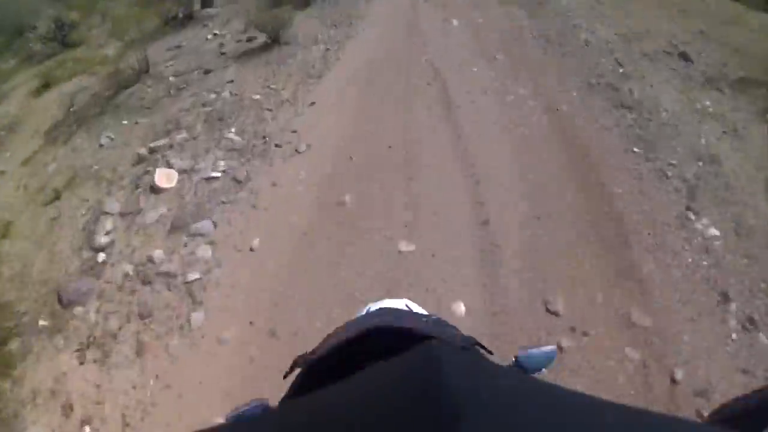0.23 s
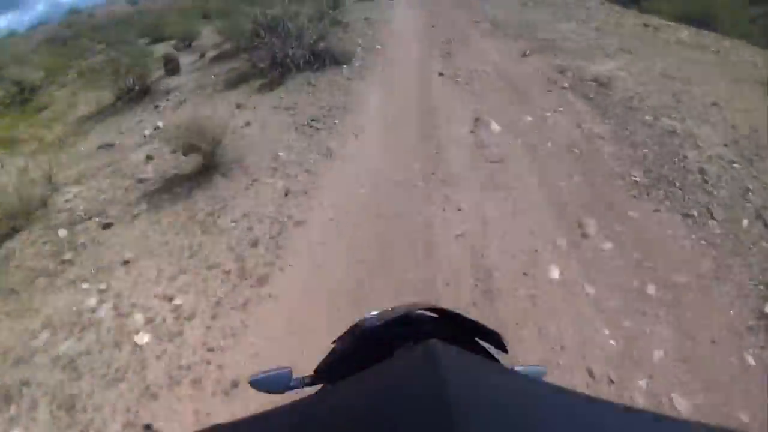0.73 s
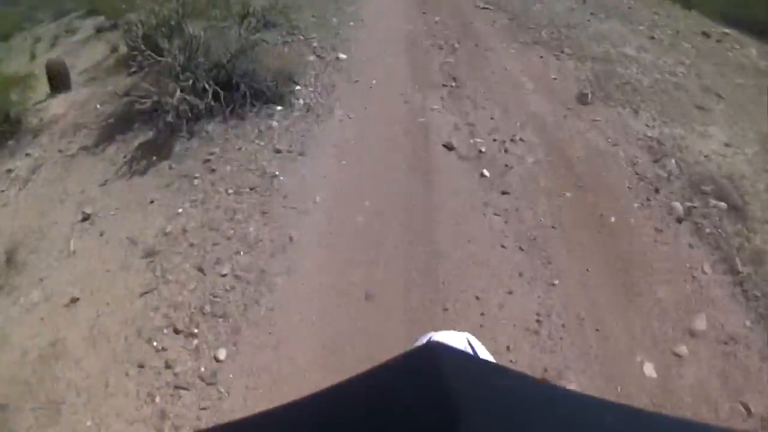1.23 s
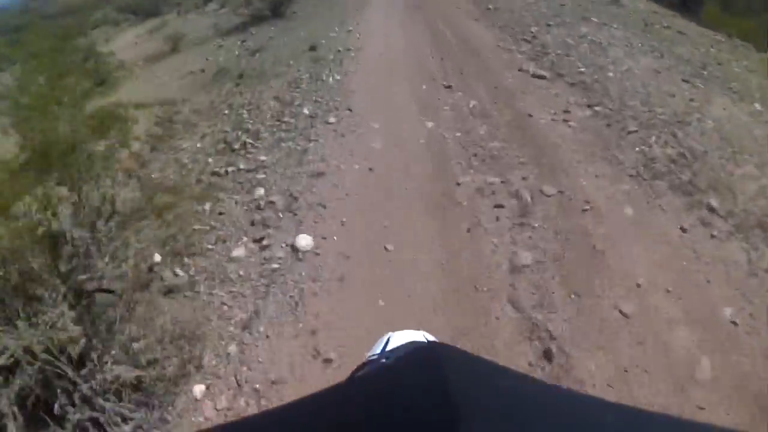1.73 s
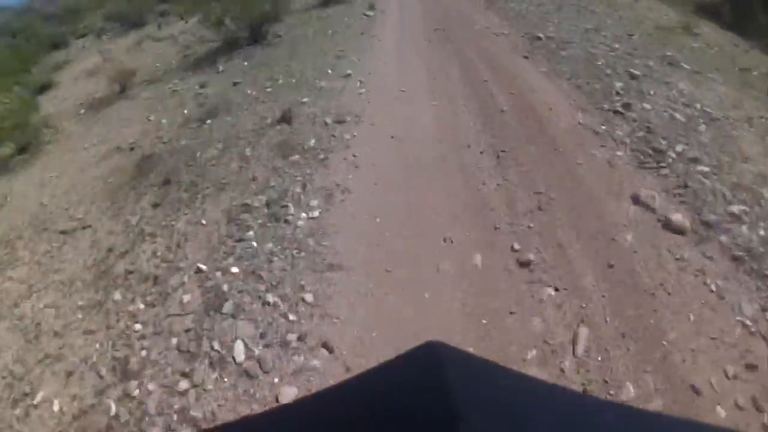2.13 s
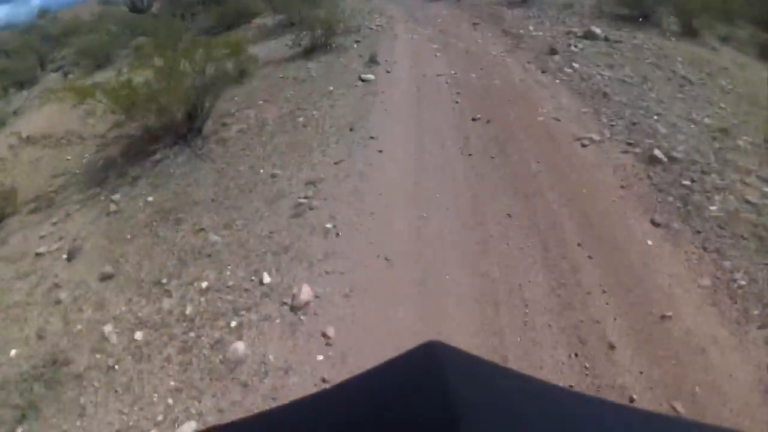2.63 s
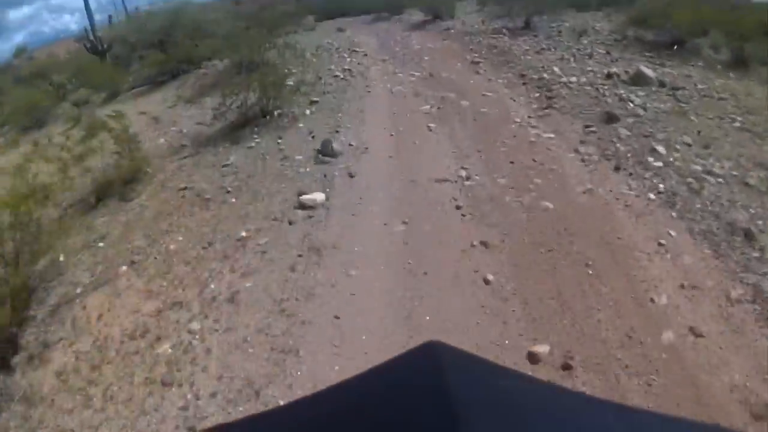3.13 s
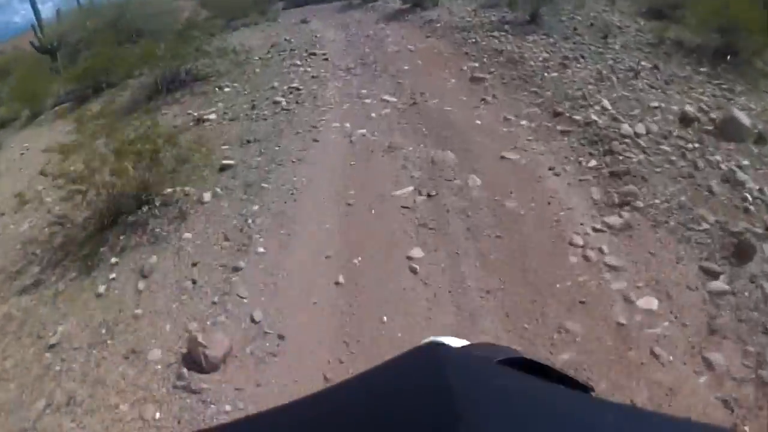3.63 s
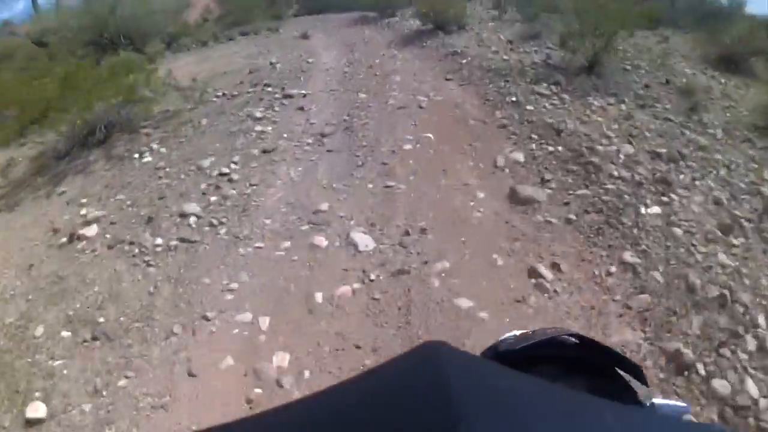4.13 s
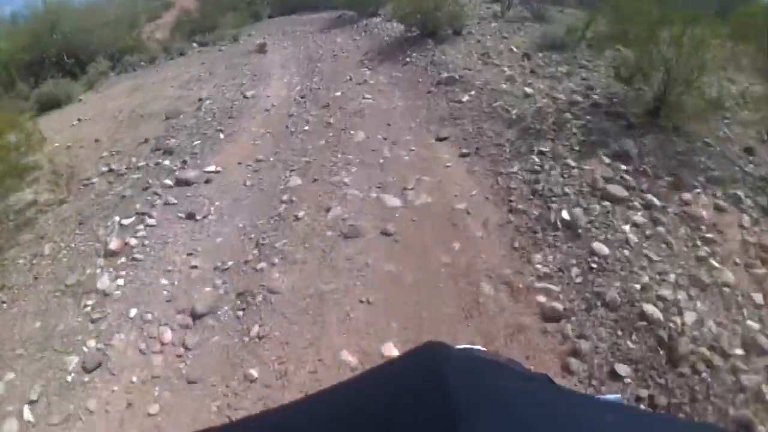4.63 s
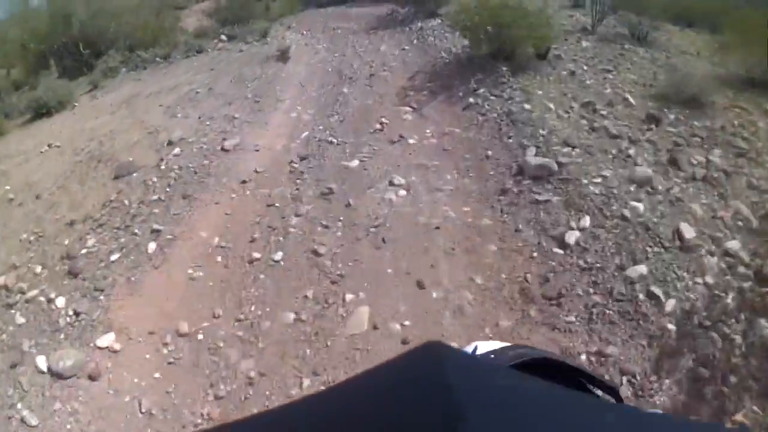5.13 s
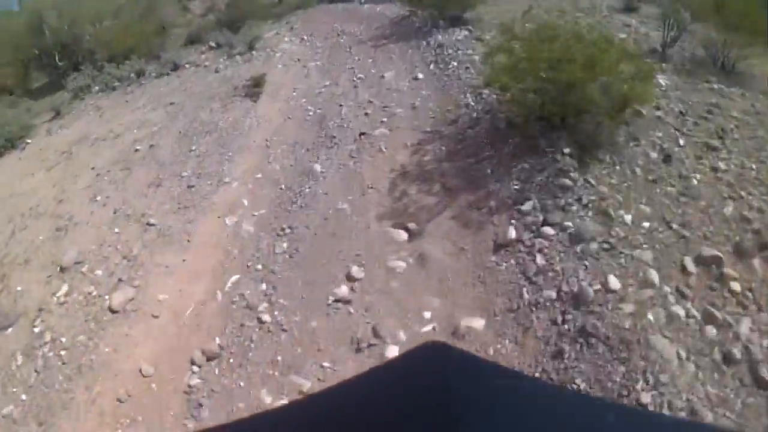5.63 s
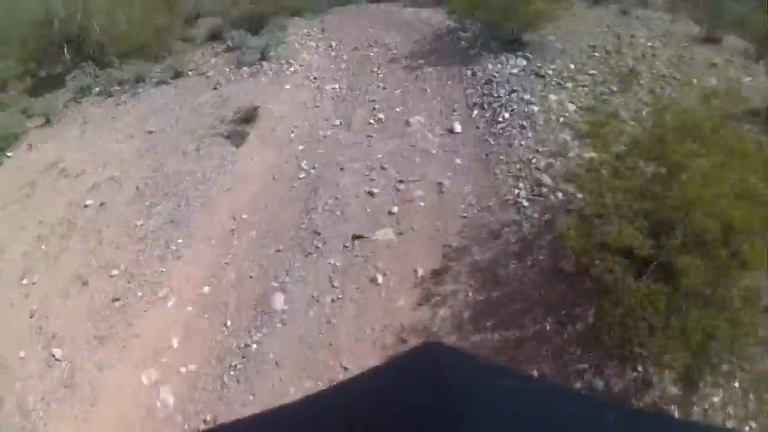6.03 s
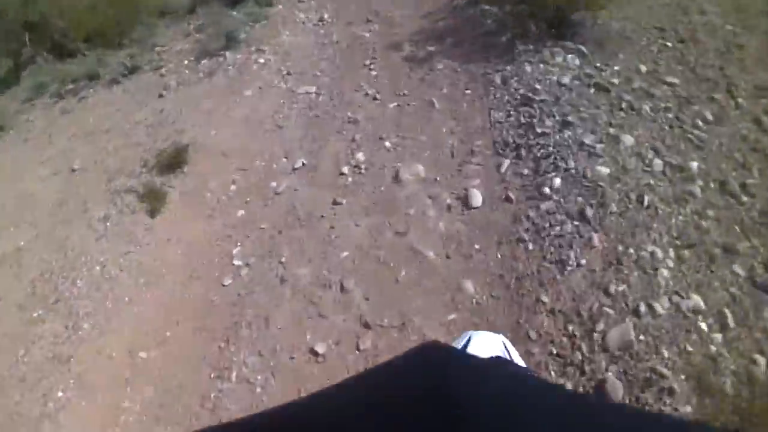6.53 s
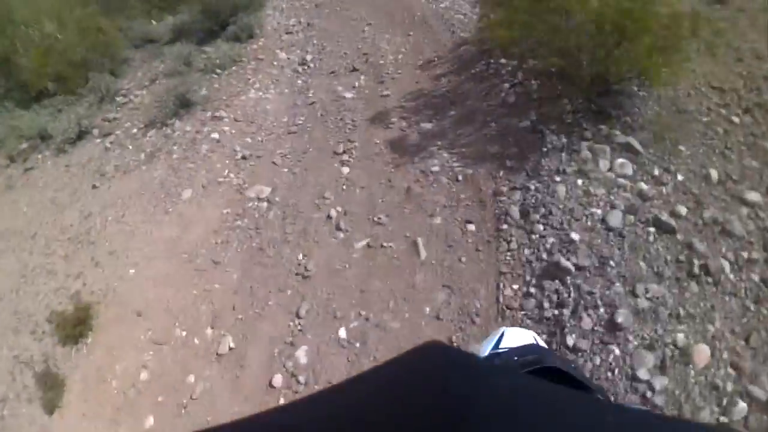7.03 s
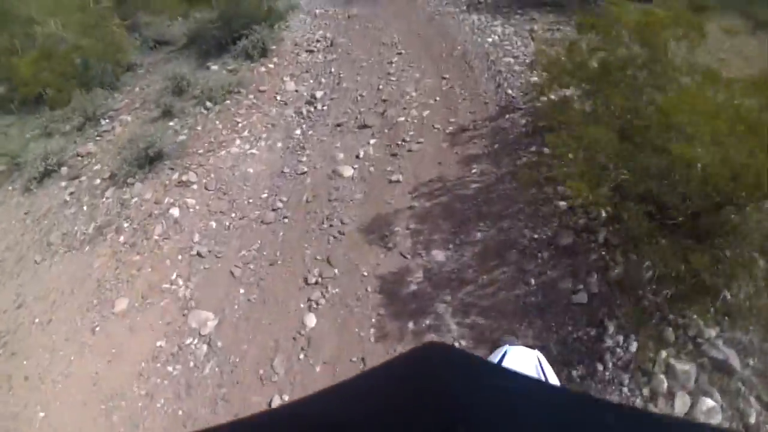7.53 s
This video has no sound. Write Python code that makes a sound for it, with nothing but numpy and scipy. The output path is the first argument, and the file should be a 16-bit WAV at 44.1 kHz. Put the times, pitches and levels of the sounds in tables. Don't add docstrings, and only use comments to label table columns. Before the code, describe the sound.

Close, overloaded wind buffeting opens the ride, roaring and flapping against a plastic case with sharp knocks and bright sizzle. After about two seconds it breaks up into separate puffs with brief gaps. Toward the end it is mostly a dull, boxy rush over low engine and wheel rumble, with light stone ticks, one hard late slap near six seconds, and a very faint high whine. Dry outdoors, no echo.

```python
import sys
import numpy as np
from scipy import signal
from scipy.fft import rfft, irfft, next_fast_len
from scipy.io import wavfile
from scipy.ndimage import uniform_filter1d, minimum_filter1d

SR = 44100
rng = np.random.default_rng(int(sys.argv[2]) if len(sys.argv) > 2 else 0)


def volts_from_decibels(level):
    exponent = np.asarray(level, float) / 20
    return 10 ** exponent


def store_pcm(level_fs):
    pcm = np.round(np.clip(level_fs, -1, 1) * 32767).astype(np.int16)
    wavfile.write(sys.argv[1], SR, np.atleast_2d(pcm).T)


N = 343980
TIME = np.arange(N) / SR
SIZE = next_fast_len(N + 8192)

# frequency_hz, density_db (per Hz)
SHELL_RESPONSE = [(25, -36.5), (270, -16), (630, -12.5), (1050, -10), (1310, -1.5), (1560, -3), (2110, 4.5),
                  (2420, -0.5), (3050, -1.5), (3410, -12.5), (5030, -34), (5900, -52), (6100, -74)]
# frequency_hz, density_db (per Hz)
SEAL_LEAK = [(5000, -34), (6000, -4), (6760, -5.5), (7190, -6.5), (7750, -12.5), (8000, -34.5), (8250, -13),
             (8740, -6.5), (9300, -2), (10900, 1), (12500, -4), (14000, -8), (15600, -13.5)]
# start_s, length_s, strength_db, depth_db
WIND_BURSTS = [(0.065, 0.22, -15, 4.5), (.183, 0.15, -11.5, -2), (0.342, 0.612, -10.5, 2.5),
               (0.618, 0.24, -10.5, 2), (0.956, 0.058, -12.5, 0), (1.01, .035, -19.5, -5),
               (1.188, 0.051, -23, 10.5), (1.347, 0.049, -20.5, -5), (1.463, 0.17, -27, 10),
               (1.612, 0.079, -17, 5), (1.693, 0.089, -22, 8.5), (1.791, .11, -16.5, 4.5),
               (1.897, .058, -20, 5.5), (1.965, 0.21, -28.5, 9), (2.212, .162, -13, 0),
               (2.368, 0.11, -14.5, -2.5), (2.472, .13, -16, 5), (2.601, 0.06, -17.5, 3.5),
               (2.66, 0.062, -21, 2.5), (2.722, 0.13, -29.5, 7), (2.852, .022, -23.5, 6), (2.871, .106, -18, 4.5),
               (2.97, .28, -25, 8.5), (3.258, .192, -20, 5), (3.608, 0.058, -18, -5), (3.671, .123, -18, 1.5),
               (3.789, .051, -24.5, -2), (4.22, 0.13, -29, 11), (4.781, 0.15, -24.5, 8.5),
               (5.092, 0.083, -24, 7.5), (5.237, 0.023, -25, 9.5), (5.263, 0.017, -32, 7),
               (6.064, 0.064, -22.5, 4.5), (6.126, 0.01, -28, -3), (1.059, .022, -24.5, 1),
               (0, 0.028, -16, 1), (0.042, 0.019, -20.5, -4), (1.083, 0.026, -14.5, -11), (1.119, 0.023, -16, 3),
         (1.27, 0.038, -14.5, 3.5), (1.31, 0.019, -18, -1), (1.379, 0.033, -16.5, 3.5),
         (1.44, 0.035, -19, 6), (2.107, 0.037, -19, 6), (2.139, 0.038, -20.5, 1), (2.197, 0.02, -19, 7),
         (3.479, 0.062, -25, 8), (3.547, 0.034, -23, 8), (3.588, 0.01, -24, 7), (3.897, 0.016, -26.5, 4),
         (3.975, 0.062, -28, -6), (3.994, 0.017, -22, 4), (4.253, .043, -22.5, 6), (4.379, 0.011, -22.5, 6),
         (4.353, 0.045, -34.5, 13), (4.969, 0.016, -31.5, 6), (5.319, 0.011, -35, 19),
         (5.358, 0.02, -26.5, 8.5), (5.952, 0.077, -28.5, 7), (5.97, 0.017, -21, -7),
         (6.022, 0.039, -19.5, 1), (6.387, 0.029, -38, 12), (6.563, 0.023, -35, 14),
         (7.23, 0.011, -34.5, 9.5), (7.752, .06, -34, 15.5)]
# centre_s, half_width_s, depth_db
LULLS = [(.036, 0.011, 7.5), (.123, .006, 9), (.145, .004, 5), (0.177, 0.0036, 10), (.343, 0.0042, 3.5),
         (.43, .006, 6), (.468, 0.0055, 6), (.565, 0.0099, 5), (.636, .006, 4.5), (.79, .004, 4.5),
         (.9, .005, 4.5), (.955, 0.0046, 7), (.982, .005, 5.5), (1.02, .004, 6), (1.07, 0.011, 5.5),
         (1.16, 0.026, 8), (1.256, 0.015, -4.5), (1.425, .012, -1), (1.865, 0.0038, 7), (2.186, 0.008, 4.5),
         (2.207, 0.0044, 10.5), (3.585, 0.0073, 5), (3.665, 0.0042, 7.5), (3.704, 0.0027, 3.5),
         (3.734, 0.0045, 12.5), (3.803, 0.0031, 3.5), (4.899, 0.0061, 5), (4.916, 0.0027, 0),
         (5.19, .015, 7), (5.234, .002, 6), (3.545, .006, 0), (3.606, .003, 7), (3.772, .004, 5),
         (2.372, 0.0046, 5.5), (2.895, .005, 3), (1.379, .003, 10), (1.546, .004, 4), (4.214, 0.0045, 7),
         (3.967, 0.0037, 6.5), (5.357, .003, 6), (.011, 0.0036, 6.5), (6.014, .005, 11), (5.998, .003, 10),
         (6.065, .004, 5.5), (7.78, .005, 8), (7.799, 0.0027, 12.5)]
# centre_s, half_width_s, rise_db
SWELLS = [(.095, 0.0074, 0), (.41, .02, 5), (.51, .02, 4), (.6, .015, 2), (.665, .02, 0), (.72, .02, -0.5),
          (.85, 0.018, -3.5), (1.572, .012, 1.5), (1.67, 0.016, 3.5), (1.83, .02, 1), (1.885, .012, 1),
          (1.945, 0.009, 3), (2.27, .02, 2), (2.34, .02, 2.5), (2.425, .015, 2.5), (2.585, 0.012, -0.5),
          (2.71, .008, 4.5), (2.882, .007, 2.5), (3.1, .012, 2), (3.135, .015, 3.5), (3.21, .02, 1),
          (3.355, .01, 0), (3.425, .025, 2.5), (3.512, .012, 0.5), (3.645, .01, 1.5), (3.687, .008, 2.5),
          (3.718, .008, 1.5), (3.785, .008, -0.5), (4.84, 0.028, 0.5), (4.76, 0.013, 8), (5.248, .008, 2),
          (5.98, .008, 3), (6.6, .02, 6.5), (7.02, 0.023, 7)]
# start_s, length_s, extra_db
SEAL_GAPS = [(1.194, .02, 13.5), (1.229, .04, 9), (1.959, .14, 10.5), (1.975, 0.056, 6), (1.359, 0.042, 4),
             (2.239, .03, 4.5), (2.448, .08, 2.5), (3.39, 0.041, 4), (3.738, .06, 9), (3.798, 0.036, 15.5),
             (3.968, .01, 10), (5.36, .015, 5), (5.942, .025, 18)]
# start_s, peak_db, pitch_hz
SLAPS = [(0.0179, 0, 1420), (0.0473, -11, 1300), (0.0613, -2.5, 1610), (0.162, -5, 1430), (0.182, 0, 1340),
         (0.9632, 6.5, 2040), (1.0775, -4.5, 2030), (1.0868, -3.5, 1980), (1.1178, -5.5, 1500),
         (1.1902, -6, 1160), (1.2385, -7.5, 1350), (1.274, -1.5, 1930), (1.343, -5, 1710),
         (1.3713, -5.5, 1310), (1.3844, -1, 2090), (1.441, -8.5, 1430), (1.4466, -7, 2050),
         (1.5509, -7.5, 1310), (1.7824, -0.5, 1170), (2.117, -4.5, 1520), (2.1949, -3, 1370),
         (2.2144, -4, 1970), (2.5057, 3, 2050), (2.8565, -7.5, 2070), (2.9037, -1.5, 1930),
         (3.031, -6, 1360), (3.059, -10, 1980), (3.0824, -10, 1630), (3.2695, -10, 2020),
         (3.4867, -4, 1490), (3.5594, -6, 1360), (3.595, -3, 1370), (3.6811, 0, 1450), (3.7422, -2.5, 2120),
         (3.9737, -7.5, 1290), (3.9988, -9.5, 2130), (4.219, -11.5, 1320), (4.2518, -7, 1460),
         (4.792, -9, 1440), (4.9053, -4.5, 1290), (4.9693, -11.5, 1240), (5.031, -15, 1370),
         (5.099, -3.5, 1630), (5.212, -25, 1350), (5.229, -10, 1290), (5.3233, -19, 1260),
         (5.3617, -5, 1800), (5.4725, -6.5, 1400), (5.9489, -9, 1460), (5.9677, -14, 1530),
         (6.0018, -3, 2090), (6.0207, -6, 2020), (6.0367, 6.5, 2990), (6.1959, -13.5, 945),
         (6.55, -13, 1300), (6.57, -13, 2040), (6.7381, -10, 1370), (7.072, -11.5, 1360),
         (7.371, -14, 1360), (7.7574, -14.5, 1330)]
# start_s, peak_db, pitch_hz
STONE_TICKS = [(1.014, -3, 1810), (1.2096, -2, 1330), (3.713, 1, 2020), (3.7847, -3, 1370),
               (4.0394, -26, 1230), (4.3834, -7, 2140), (4.8294, -11, 2020), (4.87, -11, 1450),
               (5.1288, -4, 1490), (5.1644, -7, 2120), (6.0534, 0, 2150), (6.072, -2.5, 1520),
               (6.0874, -3, 2010), (6.1036, -4, 2140), (6.155, -23, 972), (6.3874, -20, 1300),
               (6.4457, -21, 1260), (6.6394, -18, 1350), (6.909, -20, 1400), (6.999, -12, 1270),
               (7.1387, -16, 1300), (7.2344, -25, 1480), (7.2994, -28, 1370), (7.519, -20, 1290),
               (7.6768, -20, 1350), (7.7626, -8, 1340), (7.7914, -10, 1350)]
# start_s, length_s, pitch_hz, level_db
HOWLS = [
    (0.309, 0.035, 1280, -12),
    (1.542, 0.064, 1184, -18),
    (1.931, .17, 1306, -19.5),
    (4.901, 0.019, 1320, -15),
    (6.191, 0.023, 990, -26.5),
]
# time_s, airspeed_db (as steady rush), facing_db (seal into the wind)
RIDE_AIR = [(0.0, -28.5, 3.5), (0.43, -24.5, 7), (0.78, -23, 6.5), (1.02, -29, 3.5), (1.24, -28, -0.5),
            (1.72, -27.5, 1), (2.04, -28.5, 1.5), (2.43, -29, 2), (2.71, -31.5, -4.5), (3.19, -32.5, -7),
            (3.67, -29, 1), (4.04, -33.5, -3), (4.8, -32.5, -5), (5.02, -35, -6), (6.02, -33.5, -1),
            (6.32, -39.5, -2), (6.93, -38.5, -8), (7.8, -42, -3.5)]
# frequency_hz, density_db (per Hz)
RUSH_SPECTRUM = [(250, -14.5), (500, -6), (1000, -2), (1200, -3), (1350, 3), (1600, -6), (2400, -10.5),
                 (3050, -7.5), (3500, -24), (4500, -35.5), (5500, -53), (6000, -73.5), (6800, -67.5),
                 (8000, -86)]
# frequency_hz, density_db (per Hz)
RUMBLE_SPECTRUM = [(20, -3.5), (40, -4), (140, 1.5), (300, 2), (500, -4), (900, -9), (2000, -57)]
# frequency_hz, density_db (per Hz)
HISS_SPECTRUM = [(6000, -26.5), (8000, -18.5), (9500, 3), (10700, 8), (12000, 4.5), (13000, -1.5),
                 (14200, 4.5), (15600, -7)]
# start_s, length_s, top_hz, fall_hz (top to end), level_db
MOANS = [(1.02, .1, 242, 28, -34), (1.225, .11, 212, 14, -32), (1.59, .125, 227, 30, -30),
         (1.965, .195, 244, 52, -28), (3.87, .06, 159, 6, -35), (3.78, .17, 266, 14, -37),
         (3.78, .06, 310, 5, -37), (5.37, .1, 104, 4, -41), (5.465, .13, 222, 6, -38),
         (5.55, .12, 124, 2, -41), (5.63, .17, 172, 42, -35), (5.95, .06, 215, 2, -39),
         (6.2, .21, 89, 12, -43)]
# start_s, peak_db, pitch_hz
TINKLES = [(3.915, -69, 10500), (4.2502, -60, 10600), (4.3046, -71, 10600), (4.215, -69, 10600),
           (4.9452, -68.5, 10600), (5.3018, -63, 10600), (5.3587, -71, 10600), (5.7892, -67.5, 10600),
           (5.8421, -56, 10600), (6.3294, -75, 10600), (6.5345, -70, 10600), (7.418, -71, 10700)]
# start_s, peak_db, pitch_hz
PINGS = [
    (1.9994, -69, 14000),
    (4.154, -67.5, 14000),
    (4.9494, -72, 14100),
    (5.2904, -71, 14100),
    (5.8172, -72, 14160),
    (5.8451, -79, 14000),
    (6.1794, -63.5, 14000),
    (6.1938, -55, 14200),
    (6.3175, -75, 14200),
]
# time_s, pitch_hz
WHINE_PITCH = [
    (0, 14915),
    (5.9, 14913),
    (5.93, 14945),
    (7.8, 14945),
]
# offset_steps (from the main line), level_db (rms)
WHINE_LINES = [
    (-2, -96),
    (-1, -92),
    (0, -82),
    (1, -85),
    (2, -95),
]
# low_hz, high_hz, depth_db, threshold (of a slow unit
EMPTY_BANDS = [
    (5750, 6250, -24, -1.1),
    (7800, 8250, -14, -.4),
    (15250, 15700, -18, .8),
]
# centre_s, depth_db
TREBLE_LOSSES = [(.065, -14), (0.325, -11.5), (0.832, -8.5), (.901, -9), (1.217, -11), (1.568, -36),
                 (1.776, -11), (1.892, -36), (2.649, -12.5), (2.983, -23.5), (3.208, -18), (3.587, -25.5),
                 (6.126, -4), (6.79, -7)]

SHELL_BAND_HZ = (1500, 3600)
SHELL_LAG_S = .003
USUAL_BURST_DB, USUAL_AIR_DB = -16.5, -33


def buffets():
    held_db, depth_db = bursts()
    _, facing_db = ride_controls()
    over_db = np.clip(held_db - USUAL_BURST_DB, -11, 11)
    flutter_db = 0.99 * np.clip(drift(50), -3, 1.5) + drift(160)
    strength_db = held_db + flutter_db + lull_db()
    facing_db = facing_db + seal_db()

    def gate(extra_db):
        return signal.lfilter([.011], [1, -.989], volts_from_decibels(strength_db + extra_db))

    grain_share = np.interp(held_db, [-26, -11], [.7, .2])
    air = turbulence(per_s=600, spread_db=2.5, grain_share=grain_share)
    deep_air = air * gate(depth_db + 1.2 * drift(13))
    deep = colour(deep_air, SHELL_RESPONSE, low_hz=300, high_hz=1453, ref=SHELL_BAND_HZ)
    body_air = air * gate(0.2 * drift(25))
    body = colour(body_air, SHELL_RESPONSE, low_hz=1440, high_hz=3760, ref=SHELL_BAND_HZ)
    edge_db = 0.48 * over_db + .8 * facing_db - 0.1
    edge_air = air * gate(edge_db + drift(20))
    edge = colour(edge_air, SHELL_RESPONSE, low_hz=3930, ref=SHELL_BAND_HZ)
    leak_db = 0.78 * over_db + facing_db - 47
    leak_air = turbulence(per_s=1700, spread_db=-3, grain_share=.5)
    sizzle = colour(leak_air * gate(leak_db + 1.4 * drift(30)), SEAL_LEAK)
    return deep + body + edge + sizzle


def bursts():
    wakes = [(s + SHELL_LAG_S / 2, 0.009, peak_db - 20.5, 8) for s, peak_db, hz in SLAPS]
    power, deep_power = np.full((2, N), 1e-7)
    for s, length, strength_db, depth_db in WIND_BURSTS + wakes:
        start = s - SHELL_LAG_S
        span = slice(max(int(start * SR), 0), int((start + length) * SR))
        power[span] += volts_from_decibels(2 * strength_db)
        deep_power[span] += volts_from_decibels(2 * (strength_db + depth_db))
    return 10 * np.log10(power), 10 * np.log10(deep_power / power)


def lull_db():
    dips = [(s, half, -depth_db) for s, half, depth_db in LULLS]
    return sum(change_db * np.exp(-((TIME - s) / max(half, .002)) ** 2)
               for s, half, change_db in dips + SWELLS)


def seal_db():
    return sum(extra_db * (TIME > s) * (TIME < s + length) for s, length, extra_db in SEAL_GAPS)


def ride_controls():
    s, air_db, facing_db = np.transpose(RIDE_AIR)
    return np.interp(TIME, s, air_db) - USUAL_AIR_DB, np.interp(TIME, s, facing_db)


def slaps():
    t60_s, ring_db, snap_db = 0.0063, -2.5, -9
    rings, snaps, t = np.zeros(N), np.zeros(N), TIME[:600]
    for s, peak_db, hz in SLAPS + STONE_TICKS:
        at = int(s * SR)
        ring = volts_from_decibels(peak_db + ring_db - 60 * t / t60_s) * np.sin(2 * np.pi * hz * t)
        rings[at:at + 600] += ring[:N - at]
        snaps[at] += volts_from_decibels(peak_db + snap_db)
    dulling = signal.butter(8, 3200, fs=SR, output="sos")
    return signal.sosfilt(dulling, rings) + colour(snaps, SHELL_RESPONSE, low_hz=300, ref=SHELL_BAND_HZ)


def howls():
    bandwidth_hz = 260
    out, r = np.zeros(N), np.exp(-np.pi * bandwidth_hz / SR)
    for s, length, hz, level_db in HOWLS:
        at, u = int(s * SR), np.linspace(0, 1, int(length * SR))
        pole = [1, -2 * r * np.cos(2 * np.pi * hz / SR), r * r]
        air = signal.lfilter([1], np.convolve(pole, pole), rng.standard_normal(9000))
        air = rms_one(air[1000:1000 + len(u)])
        out[at:at + len(u)] += volts_from_decibels(level_db) * np.sin(np.pi * u) ** 0.7 * air
    return out


def ride():
    air_db, facing_db = ride_controls()
    rush_db = -29 + 0.98 * air_db
    rumble_db = -38 + 0.88 * air_db
    hiss_db = -74.5 + .6 * air_db + .4 * facing_db
    lumps = drift(5.9)
    rush_air = turbulence(per_s=400, spread_db=7, grain_share=0.18)
    rush_air = rush_air * volts_from_decibels(rush_db + 0.64 * lull_db() + 1.6 * lumps)
    rush = colour(rush_air, RUSH_SPECTRUM, ref=(900, 3600))
    lean_db = 1.5 * np.clip(lumps[::-1], -2, 2)
    rush = band_gain(rush[None], 1080, 1340, volts_from_decibels(lean_db))
    rush = band_gain(rush, 1340, 1620, volts_from_decibels(-lean_db))[0]
    rumble_noise = rng.standard_normal(N) * volts_from_decibels(rumble_db + 1.8 * drift(20))
    rumble = colour(rumble_noise, RUMBLE_SPECTRUM, ref=(30, 400))
    hiss_noise = rng.standard_normal(N) * volts_from_decibels(hiss_db + 1.8 * drift(20))
    hiss = colour(hiss_noise, HISS_SPECTRUM, ref=(8500, 14500))
    return rush + rumble + hiss


def moans():
    out = np.zeros(N)
    for s, length, top_hz, fall_hz, level_db in MOANS:
        at, u = int(s * SR), np.linspace(0, 1, int(length * SR))
        start_hz = top_hz - .75 * fall_hz
        arch = np.polyfit([0, .4, 1], [start_hz, top_hz, top_hz - fall_hz], 2)
        phase = 2 * np.pi * np.cumsum(np.polyval(arch, u)) / SR
        swell = np.sin(np.pi * u) ** .5
        out[at:at + len(u)] += np.sqrt(2) * volts_from_decibels(level_db - 0.5) * swell * np.sin(phase)
    return out * volts_from_decibels(1.2 * drift(30))


def jingles(events, t60_s, split_hz):
    out = np.zeros(N)
    for s, peak_db, hz in events:
        at = int(s * SR)
        t = TIME[:min(int(.4 * SR), N - at)]
        pair = np.sin(2 * np.pi * hz * t) + .5 * np.sin(2 * np.pi * (hz + split_hz) * t)
        out[at:at + len(t)] += volts_from_decibels(peak_db - 3 - 60 * t / t60_s) * pair
    return out * volts_from_decibels(3 * drift(40))


def whine():
    step_hz = 92
    hz = np.interp(TIME, *np.transpose(WHINE_PITCH))
    out = np.zeros(N)
    for k, level_db in WHINE_LINES:
        phase = 2 * np.pi * np.cumsum(hz + k * step_hz) / SR + np.pi * k * k / 2
        out += np.sqrt(2) * volts_from_decibels(level_db) * np.sin(phase)
    return out


def turbulence(per_s, spread_db, grain_share):
    sizes = volts_from_decibels(spread_db * np.minimum(rng.exponential(1, N), 2.2)) * rng.choice([-1, 1], N)
    grains = rms_one(sizes * (rng.random(N) < per_s / SR))
    share = np.clip(grain_share, 0, 1)
    return np.sqrt(share) * grains + np.sqrt(1 - share) * rng.standard_normal(N)


def rms_one(x):
    return x / np.sqrt(np.mean(x ** 2) + 1e-20)


def drift(rate):
    r = np.exp(-40 * np.pi * rate / SR)
    noise = rng.standard_normal(N // 20 + 4002)
    slow = signal.lfilter([1], [1, -2 * r, r * r], noise)[4000:]
    return np.interp(np.arange(N) / 20, np.arange(len(slow)), rms_one(slow))


def colour(x, points, low_hz=1, high_hz=30000, ref=(20, 20000)):
    hz = np.maximum(np.fft.rfftfreq(8192, 1 / SR), 5)
    points_hz, points_db = np.transpose(points)
    gain = volts_from_decibels(np.interp(np.log(hz), np.log(points_hz), points_db))
    gain = gain / np.sqrt(np.mean(gain ** 2 * (hz > ref[0]) * (hz < ref[1])))
    gain = gain / np.sqrt((1 + (low_hz / hz) ** 12) * (1 + (hz / high_hz) ** 12))
    cepstrum = irfft(np.log(gain + 1e-7))
    cepstrum[1:4096] *= 2
    cepstrum[4097:] = 0
    pulse = irfft(np.exp(rfft(cepstrum)))
    return irfft(rfft(x, SIZE) * rfft(pulse, SIZE), SIZE)[:N]


def band_gain(x, low_hz, high_hz, gain):
    hz = np.fft.rfftfreq(SIZE, 1 / SR)
    inside = 1 / (1 + ((2 * hz - low_hz - high_hz) / (high_hz - low_hz)) ** 16)
    padded = np.pad(x, [(0, 0), (0, SIZE - N)], "reflect")
    band = irfft(rfft(padded) * inside, SIZE)[..., :N]
    return x + (gain - 1) * band


def scene():
    tinkles = jingles(TINKLES, t60_s=.2, split_hz=45)
    pings = jingles(PINGS, t60_s=.25, split_hz=90)
    return (buffets() + slaps() + howls() + ride() + moans() + tinkles + pings + whine())[None]


def thin_treble(x):
    for low_hz, high_hz, depth_db, threshold in EMPTY_BANDS:
        empty = drift(9) > threshold
        x = band_gain(x, low_hz, high_hz, uniform_filter1d(volts_from_decibels(depth_db * empty), size=500))
    lost_db = sum(depth_db * np.exp(-((TIME - s) / 0.013) ** 4) for s, depth_db in TREBLE_LOSSES)
    return band_gain(x, 4300, 20000, volts_from_decibels(lost_db))


def limiter(x):
    peak = -minimum_filter1d(-np.abs(x), size=240)
    gain = np.minimum(1, .93 / (peak + 1e-9))
    gain = uniform_filter1d(uniform_filter1d(gain, size=130), size=130)
    return x * gain


def low_pass(x):
    return signal.sosfilt(signal.butter(12, 15740, fs=SR, output="sos"), x)


def record(dry):
    mix = np.clip(thin_treble(limiter(dry)), -1, 1)
    return low_pass(mix)


dry = scene()
out = record(dry)
store_pcm(out)
```